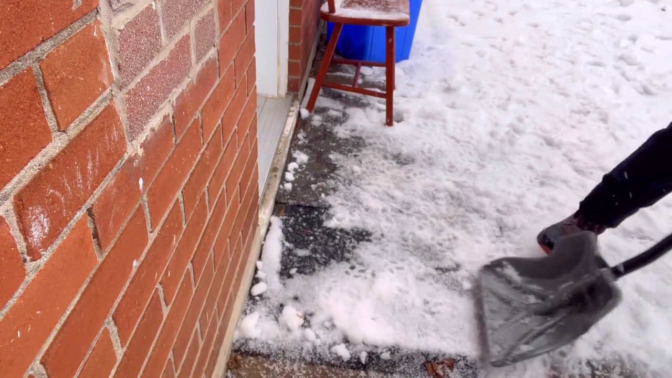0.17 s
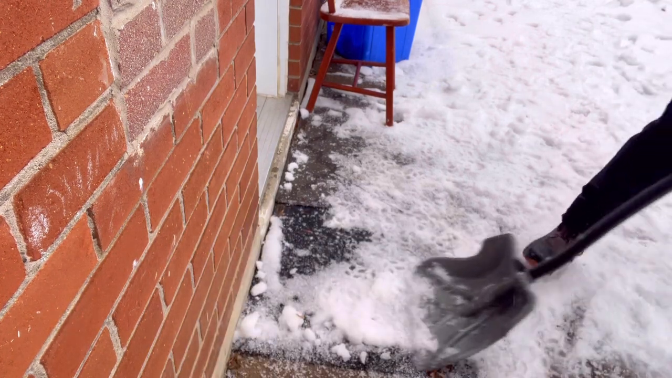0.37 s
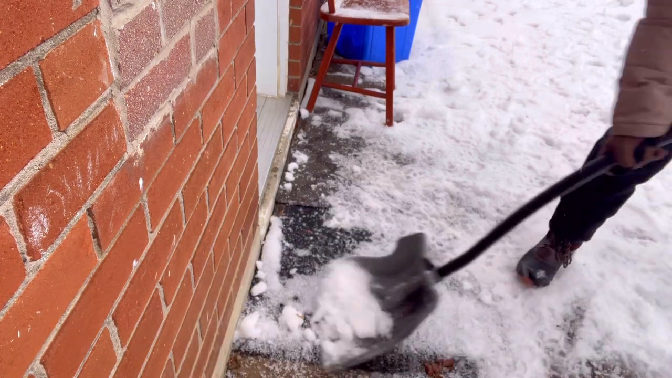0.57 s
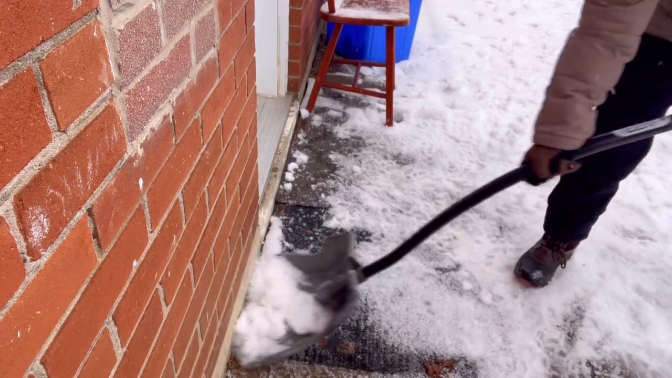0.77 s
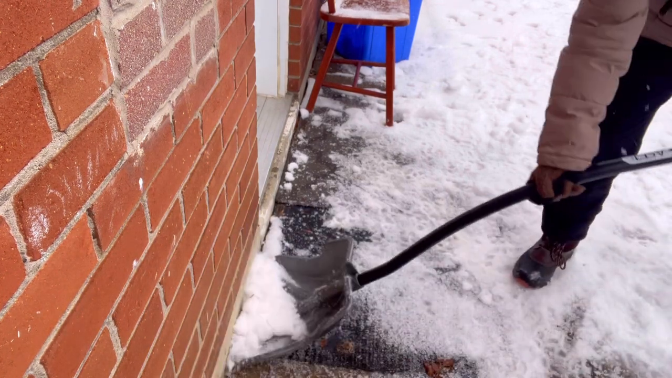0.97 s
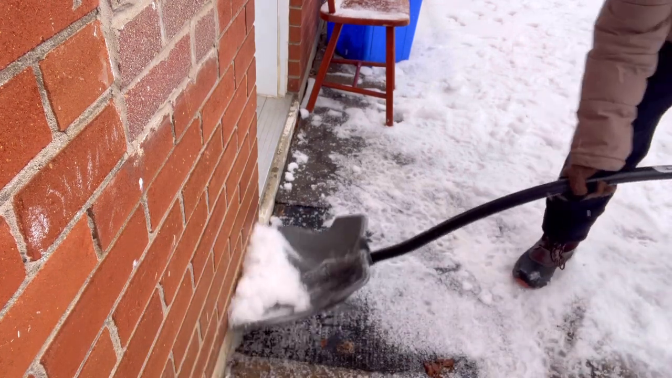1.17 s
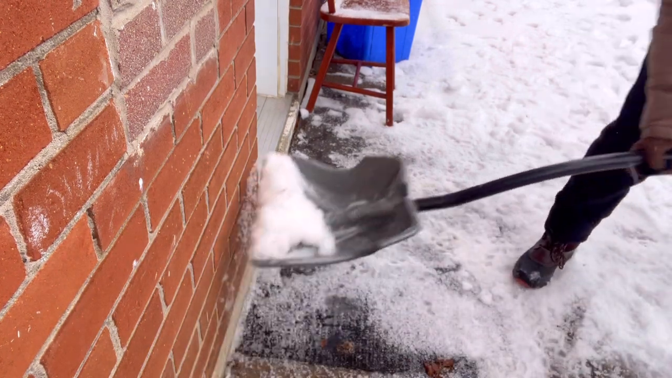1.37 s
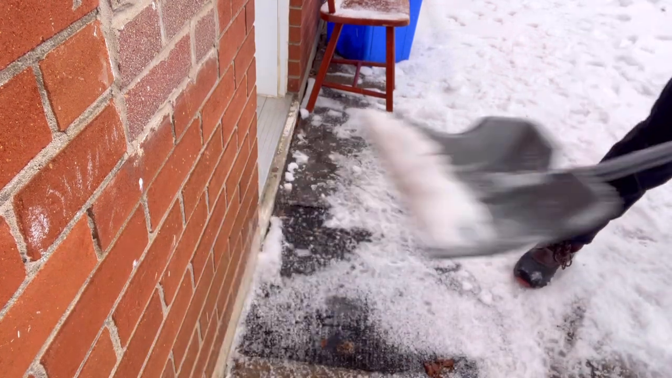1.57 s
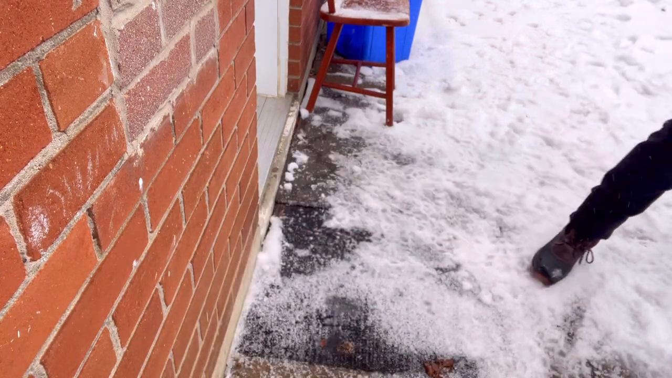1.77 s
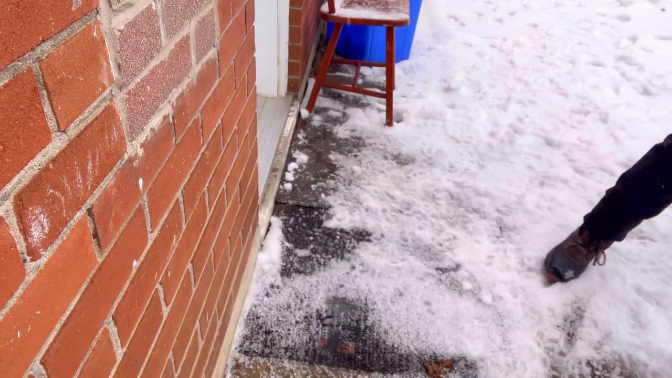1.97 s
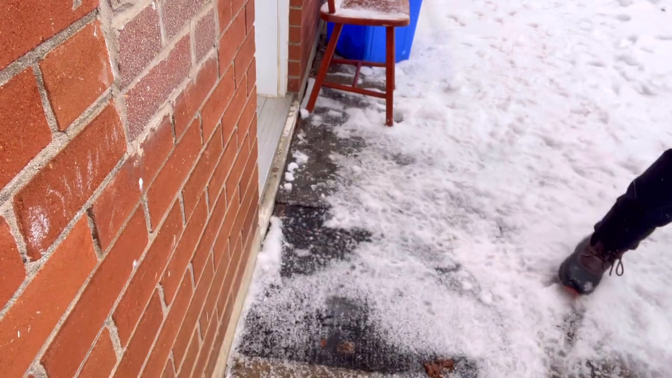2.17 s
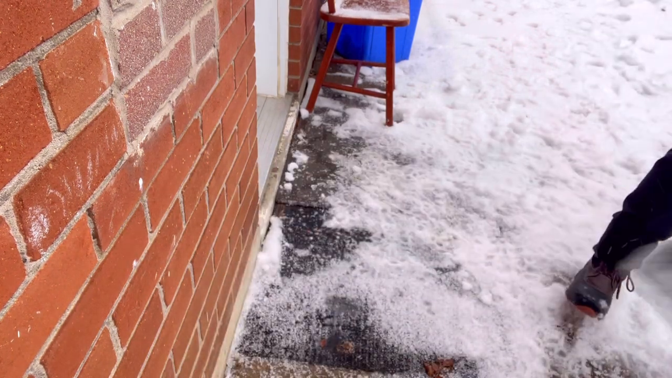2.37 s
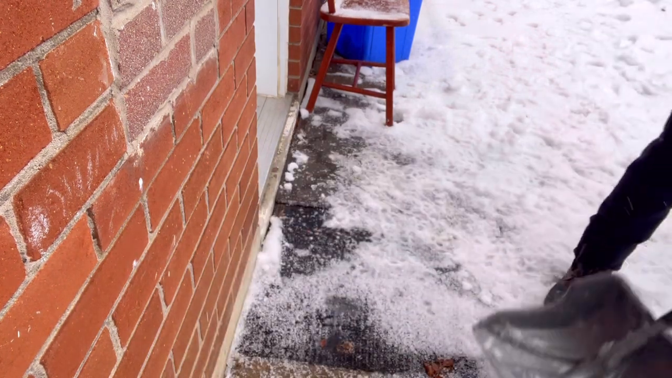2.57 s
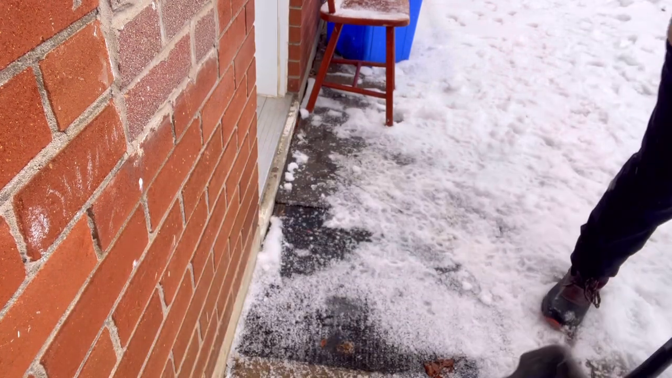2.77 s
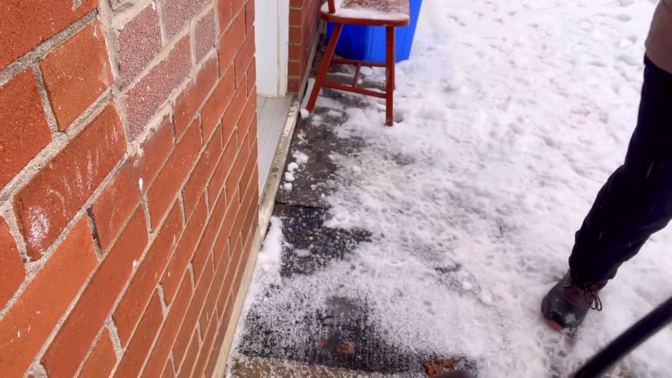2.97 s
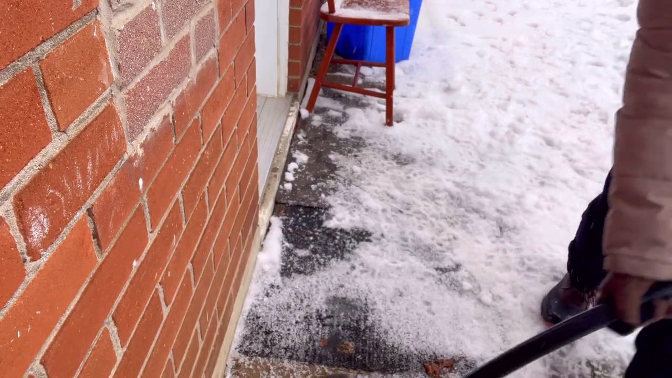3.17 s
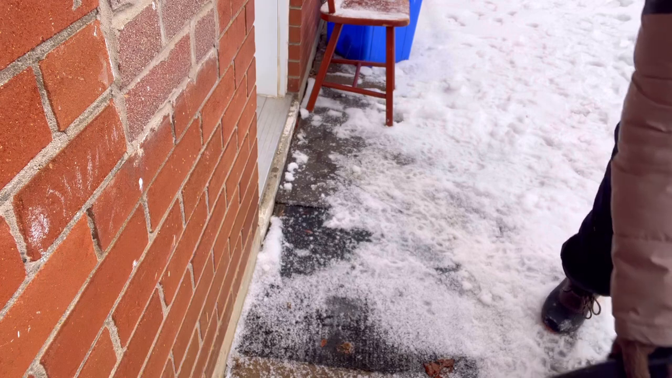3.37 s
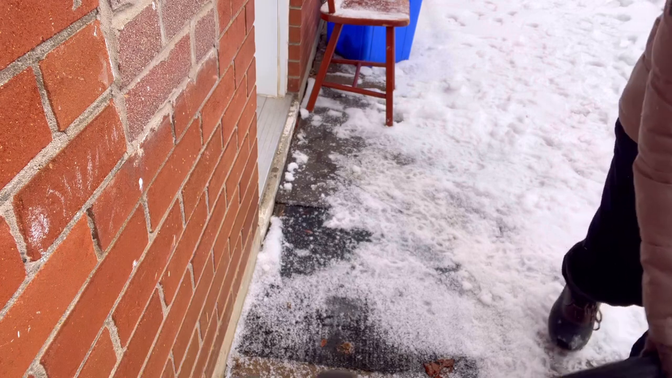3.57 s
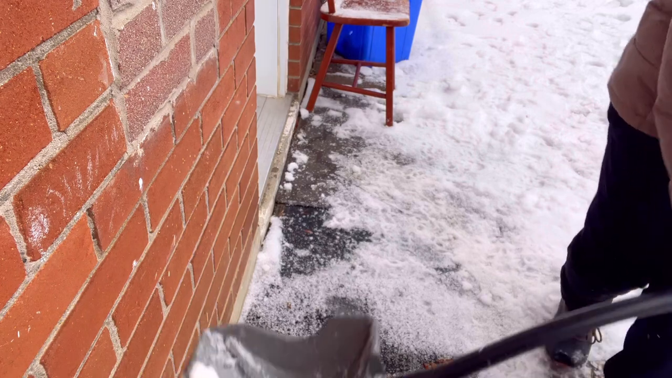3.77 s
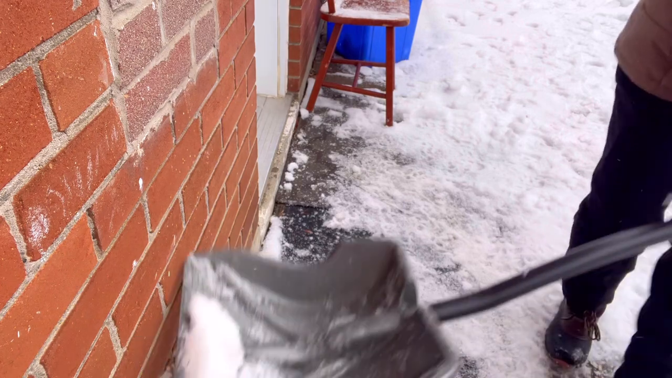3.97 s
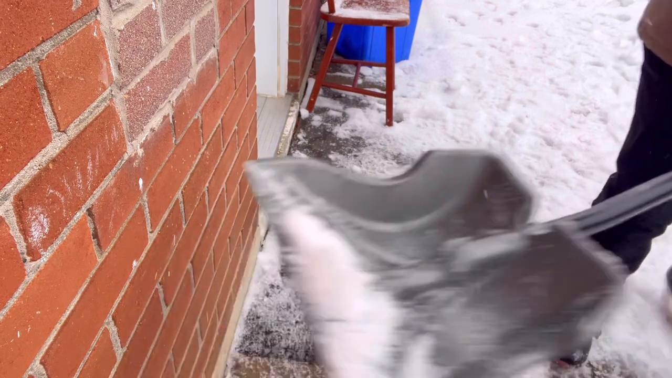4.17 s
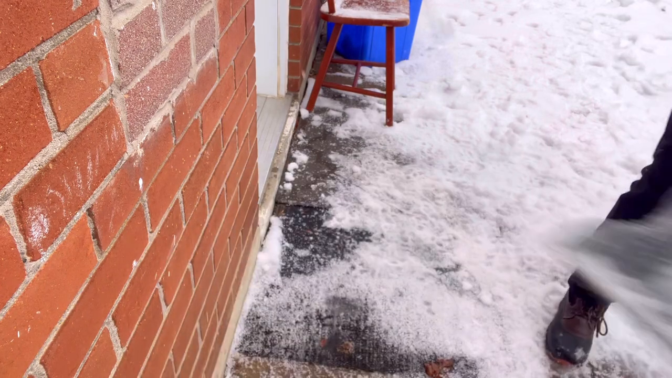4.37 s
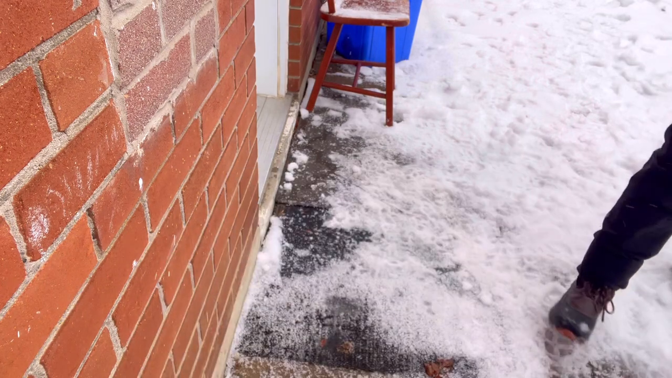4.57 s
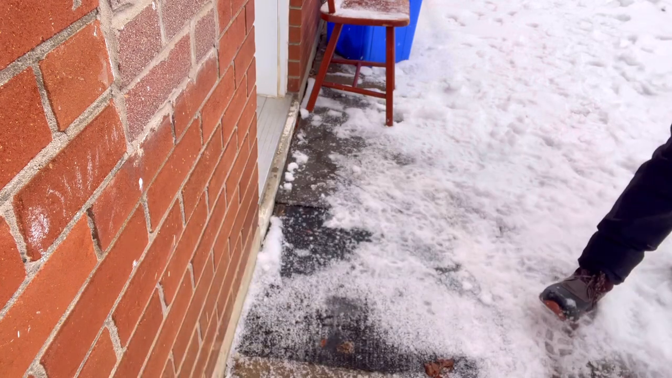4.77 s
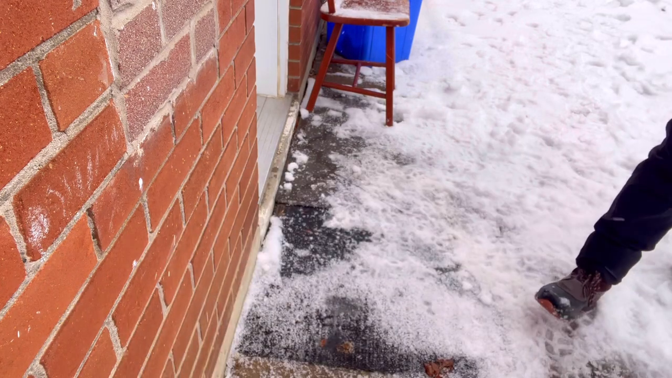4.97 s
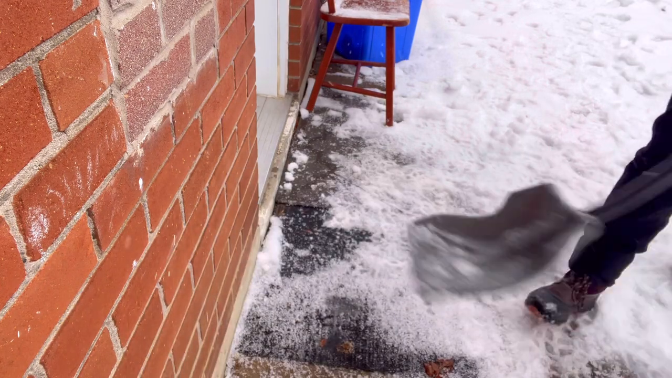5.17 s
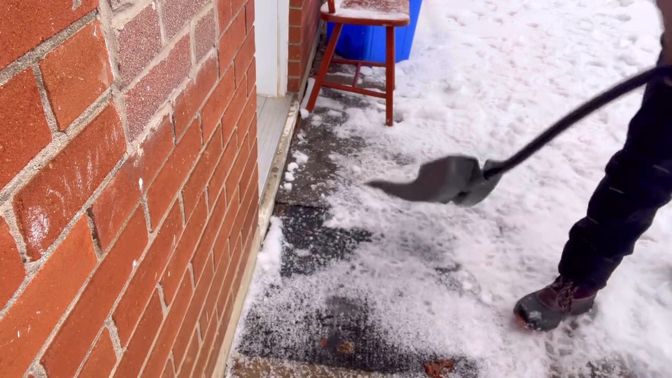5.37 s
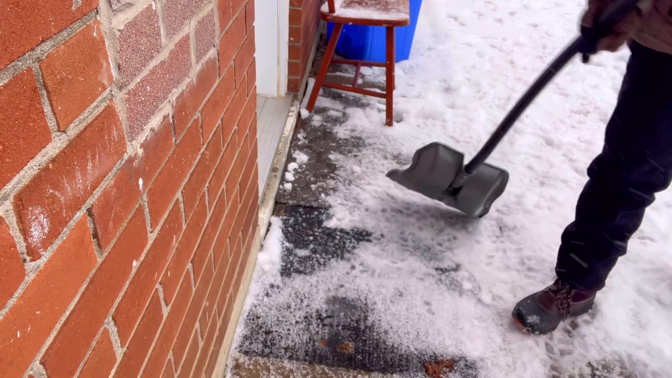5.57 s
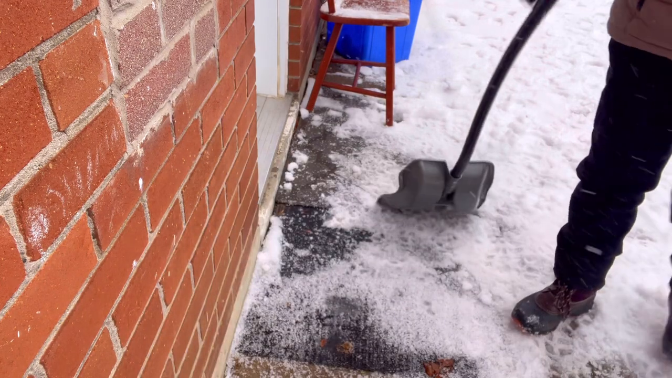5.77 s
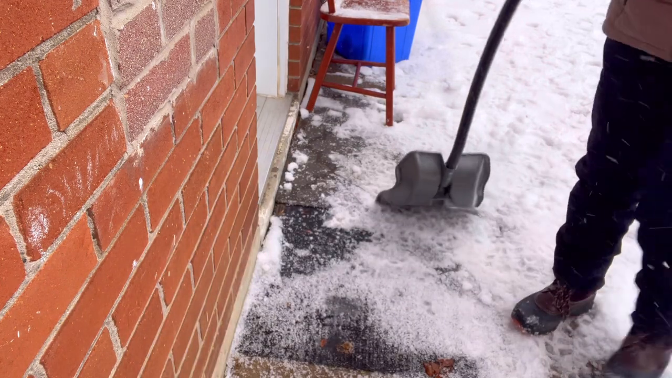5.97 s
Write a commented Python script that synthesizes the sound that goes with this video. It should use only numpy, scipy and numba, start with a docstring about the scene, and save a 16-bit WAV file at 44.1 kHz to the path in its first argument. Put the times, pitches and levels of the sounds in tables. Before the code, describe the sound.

Two rasping shovel pushes across slushy paving end in hollow plastic knocks and stuttering groans, with coat swishes and soft snow crunches between.

```python
"""Shovelling slush towards a wall

A plastic snow shovel is pushed twice over slushy paving to a brick wall, then set down and dragged briefly.
Showers of tiny impacts make the edge rasp and hiss; stick and slip makes the scoop boom and the edge groan.
Damped swings make the knocks at the wall, dull thuds, and small clicks of ice, stone and the scoop.
Shaped noise makes the coat rustle, the snow crunch and the low outdoor rumble; two small ports hear it all.
"""
import sys
import numpy as np
from scipy import signal
from scipy.fft import rfft, irfft, next_fast_len
from scipy.io import wavfile
from scipy.ndimage import uniform_filter1d, map_coordinates
from numba import njit

SR = 44100
rng = np.random.default_rng(int(sys.argv[2]) if len(sys.argv) > 2 else 0)


def put_to_file(sound):
    """Save the sound as 16-bit audio at rate SR, in the file named by the first command-line argument."""
    columns = np.atleast_2d(sound).T  # one column per channel
    safe = np.clip(columns, -1, 1)
    whole_steps = np.round(safe * 32767)
    wavfile.write(sys.argv[1], SR, whole_steps.astype(np.int16))


N = 265217

# The edge slides over the paving; levels are those at the start, before the ground changes them:
# start t/s, stop t/s, rasp level/dB, grit hiss level/dB, boom level/dB, flexing edge f/Hz
PUSHES = [(0.264, 0.806, -25.5, -25, -35.5, 1280), (2.703, 3.189, -21.5, -25.5, -34, 1034),
          (5.542, 5.555, -29, -27, -29, 1400), (5.663, 5.746, -37, -42, -33, 1350),
          (5.795, 5.86, -39, -43, -37, 1490)]
# The loaded scoop is prised up along the wall; levels before fades and ground: grip t/s, hardest t/s,
# free t/s, rasp level/dB, grit hiss level/dB, boom level/dB, rise of force/dB, fall of force/dB
LIFTS = [(0.994, 1.113, 1.201, -28.5, -31, -7, 26, 36), (3.327, 3.512, 3.768, -25.5, -30, -9, 26, 20.5)]
# The edge catches on stones: t/s, rasp level/dB, grit hiss level/dB, boom level/dB, time to fall 60 dB/s
CATCHES = [(0.274, -22.5, -34, -42, 0.19), (0.971, -36, -40, -53, 0.13), (1.049, -23, -40, -15, .035),
           (1.106, -27, -32, -36, 0.031), (1.209, -45, -39, -33, 0.056), (2.695, -15.5, -21, -40, 0.13),
           (2.715, -16.5, -22, -46, 0.07), (2.775, -14, -20, -32, 0.027), (2.819, -16, -30, -38, 0.095),
           (2.854, -32, -33, -47, 0.074), (2.883, -20.5, -32, -41, 0.066), (2.902, -30, -22, -21, 0.077),
           (3.01, -22.5, -34, -26, 0.044), (3.046, -8, -34, -37, 0.015), (3.068, -39, -35, -36, 0.022),
           (3.126, -20, -35, -57, 0.037), (3.324, -26, -37.5, -43, 0.055), (3.351, -31.5, -36, -26, 0.4),
           (3.628, -28.5, -36, -25, 0.019), (3.688, -24.5, -47, -15, 0.053), (3.748, -36, -59, -3, 0.034),
           (3.785, -24.5, -40.5, -25.5, 0.21), (3.854, -28.5, -39, -54, 0.11), (5.557, -45, -64, -27, 0.32),
           (5.673, -30.5, -33.5, -38, 0.13), (5.719, -22, -27.5, -46, 0.043)]
# Uneven ground (bare stone and packed snow swell a stroke, slush muffles it, a stuck edge falls quiet):
# middle t/s, half width/s, change of rasp/dB, change of hiss/dB, change of boom/dB
PATCHES = [(0.334, 0.022, -6, -2, 0.5), (0.43, 0.1, 1, 1.5, 2.5), (0.61, 0.13, -2.5, -1.5, 0.5),
           (0.816, 0.0099, -9, -9.5, 22), (1.02, 0.019, -2, -9.5, 2.5), (1.084, .018, -4, -1.5, -2),
           (1.161, 0.0089, 2, 3.5, -20), (2.756, 0.057, -2.5, -6.5, 7), (2.836, 0.066, 1, 6.5, -3),
           (2.875, 0.019, -1.5, -1.5, -2), (2.957, 0.035, -3.5, 2.5, 2), (3.029, 0.058, 2, 6.5, 3.5),
           (3.11, 0.026, 0, 0.5, -2), (3.17, .02, -0.5, -0.5, 1.5), (3.466, .008, 4, -8, -2.5),
           (3.541, .008, 4, 2, -4.5), (3.578, 0.0053, 3, 5.5, -7.5), (3.676, 0.026, -2.5, 2, -6.5),
           (3.714, .008, -0.5, -5, -8.5), (3.777, 0.011, -3, 4, 0.5), (5.637, 0.01, 12.5, 7, -3),
           (5.773, 0.014, 7, 5.5, 4)]
# The scoop runs into the wall and shudders: t/s, knock level/dB, first f/Hz, swell/s, shudder level/dB
BUMPS = [(0.8059, -1.5, 874, 0.0013, -19), (1.1715, -9, 1090, 0.005, -18.5),
         (1.1844, -2.5, 810, 0.0035, -40.5), (3.192, -2.5, 882, 0.003, -12.5)]
# The stuck edge jerks free during a lift: t/s, knock level/dB, first f/Hz, swell/s
JOLTS = [(1.0698, -7.5, 885, 0.00097), (1.0944, -9, 1130, 0.0015), (1.108, -4.5, 594, 0.0023),
         (1.113, -4.5, 585, 0.0022), (1.1202, -5, 628, 0.0027), (1.1777, -26, 1070, 0.0035),
         (3.4315, -9, 790, 0.0022), (3.4799, -1.5, 740, 0.0021), (3.4894, -5, 642, 0.0036),
         (3.4953, -6, 800, .0015), (3.504, -3.5, 774, 0.0014), (3.518, -6.5, 655, 0.0025),
         (3.5218, 0, 682, 0.0023), (3.5516, -10.5, 770, 0.0019), (3.563, -9, 680, 0.0007),
         (3.5848, -1.5, 642, 0.0028), (3.607, -3.5, 716, 0.0026), (3.626, -3, 665, 0.0028),
         (3.6324, -3.5, 730, 0.0029), (3.647, -8, 570, 0.005), (3.6566, -20.5, 593, 0.0048),
         (3.69, -2, 652, 0.0027), (3.724, -9, 545, 0.0018), (3.749, -15, 1045, 0.0017)]
# The blade binds on brick, ice or stone and groans: start t/s, stop t/s, level/dB, first f/Hz, last f/Hz
GROANS = [(0.774, 0.807, -28.5, 1400, 1490), (0.833, 0.888, -41, 650, 570),
          (0.995, 1.05, -34.5, 1290, 1380), (1.049, 1.086, -27, 1330, 1220), (1.056, 1.076, -24, 650, 880),
          (1.105, 1.124, -26.5, 1180, 1190), (1.131, 1.131, -20, 507, 445), (1.17, 1.18, -20, 1050, 917),
          (1.19, 1.204, -29, 624, 447), (2.702, 2.694, -27, 1040, 960), (2.784, 2.81, -22, 1120, 890),
          (2.82, 2.865, -30, 1130, 1260), (2.888, 2.923, -24.5, 1340, 1154), (3.008, 3.015, -28, 1190, 965),
          (3.01, 3.075, -26, 500, 560), (3.344, 3.423, -37.5, 690, 710), (3.419, 3.443, -16, 734, 688),
          (3.469, 3.528, -22.5, 820, 695), (3.555, 3.673, -30.5, 547, 520),
          (3.491, 3.56, -38.5, 1440, 1400), (3.753, 3.766, -31.5, 1030, 970), (3.791, 3.818, -36, 944, 930),
          (3.856, 3.86, -29, 730, 675), (5.593, 5.64, -41, 540, 490), (5.668, 5.738, -37, 1310, 1360),
          (5.723, 5.732, -28, 1450, 1340), (5.84, 5.855, -37, 1600, 1450), (5.79, 5.849, -38, 440, 407)]
# The coat swishes as the arms swing and snow slides about; rise and fall each span 20 dB:
# loudest t/s, rise/s, fall/s, swish level/dB, crunch level/dB, f/Hz
SWINGS = [(1.301, 0.37, 0.28, -49.5, -55.5, 900), (1.753, 0.15, 0.26, -43, -46, 1070),
          (2.61, 0.28, 0.13, -45.5, -72, 1085), (4.0, 0.15, 0.13, -48.5, -92, 990),
          (4.29, 0.15, 0.09, -45, -64, 860), (4.375, 0.06, 0.072, -49, -75, 940),
          (4.42, 0.045, 0.064, -51.5, -63, 1090), (4.7, 0.71, 0.42, -47, -57, 945),
          (5.21, 0.19, 0.45, -50, -67, 1020), (5.42, 0.49, 0.7, -51.5, -53.5, 1200)]
# Boots press into the snow and thrown snow showers down:
# t/s, hold/s, soft rush level/dB, crunch level/dB, time to fall 60 dB/s
CRUNCHES = [(1.511, 0.0048, -42, -51, 0.19), (1.897, 0.058, -41.5, -44.5, 0.37),
            (2.24, 0.04, -49.5, -41.5, 1.1), (3.24, 0.023, -33.5, -42.5, 0.54),
            (3.914, 0.0068, -40.5, -44.5, 0.24), (4.134, 0.0069, -46, -44, 0.16),
            (4.209, 0.042, -39.5, -48, 0.15), (4.568, 0.013, -39.5, -50.5, 0.44),
            (4.841, 0.11, -48.5, -46.5, 0.29)]
# Small clicks and cracks: icy crumbs land, the edge strikes stone, the scoop clacks or is tapped:
# t/s, click level/dB, click f/Hz, crack level/dB
CLICKS = [(1.326, -43, 980, -56), (1.622, -40, 1470, -51), (1.677, -45, 1500, -57), (1.885, -32, 2250, -47),
          (1.899, -48, 1390, -35), (1.964, -33, 3240, -31), (1.972, -38, 1800, -44), (2.22, -43, 6660, -41),
          (2.675, -30, 1130, -33), (2.7, -13, 1100, -27), (2.777, -18, 1120, -14), (2.887, -9, 1310, -8),
          (2.9, -14.5, 1290, -18), (3.625, -19, 2120, -36), (3.688, -21, 2020, -43), (3.746, -20, 990, -49),
          (3.787, -26.5, 1030, -48), (3.857, -28, 730, -41), (3.92, -33, 2100, -45),
          (4.129, -43, 1250, -42), (4.205, -41, 690, -52), (4.143, -40, 1110, -58), (4.228, -33, 4350, -41),
          (4.248, -41, 880, -45), (4.516, -44, 2600, -42), (4.572, -30.5, 780, -44),
          (4.574, -30.5, 990, -50), (4.596, -41, 950, -51), (4.667, -36, 2600, -32),
          (4.795, -45, 1640, -65), (4.818, -45, 3700, -47), (4.857, -36, 1700, -35.5),
          (4.882, -44, 2700, -51), (4.929, -35, 4070, -30), (5.541, -37, 1510, -39), (5.56, -28, 1220, -42),
          (5.676, -24, 1410, -45), (5.719, -20, 1380, -45), (5.74, -38, 1290, -42), (5.816, -28, 1170, -49),
          (5.852, -42, 1590, -37)]
# Dull thuds of boots, clumps of snow and the scoop being set down: t/s, level/dB, f/Hz
THUDS = [(0.815, -38, 69), (0.927, -41.5, 60), (1.383, -37, 66), (1.501, -34, 80), (2.562, -35.5, 71),
         (3.325, -20, 236), (4.22, -32.5, 169), (4.244, -31.5, 197), (4.577, -40, 64), (4.587, -47, 252),
         (4.878, -35.5, 198), (5.508, -31.5, 66), (5.56, -28, 102), (5.564, -28.5, 250),
         (5.585, -29.5, 216), (5.63, -28.5, 302), (5.715, -25.5, 92.6), (5.735, -31.5, 194),
         (5.836, -20, 59.5)]
# Slow drift of the rumble: t/s, change of level/dB
RUMBLE_SWELL = [(0, -2), (1.3, -1.5), (1.701, 1.5), (2.6, 3), (3.898, -5.5), (4.3, -2.5), (5.2, 5.5),
                (6.0, 8.5)]
# Resonances of the scoop: f/Hz, width/Hz, level/dB
SCOOP = [(274, 16, 3), (391, 20, 9), (461, 12, 5), (509, 22, 3), (547, 25, 4), (643, 20, 0), (687, 20, 3),
         (770, 25, 0), (930, 35, 1), (1038, 35, 3), (1247, 28, 3), (1410, 35, -1), (1671, 28, -3),
         (2020, 18, -3), (2655, 16, -1), (3633, 18, 0)]
# Relative spectra of edge, grit, scoop, cloth and background: f/Hz, level/dB
RASP = [(40, -21), (110, -4), (220, -1.5), (380, -24.5), (700, -6), (1150, -4.5), (1650, -2.5),
        (2300, -2.5), (3100, -13.5), (5000, -25), (16000, -44.5)]
GRIT = [(800, -32.5), (2200, 4), (3700, 0), (5000, -0.5), (6500, 1.5), (8300, 0), (10000, -9.5),
        (12500, -13), (14500, -11), (16000, -4)]
BOOM = [(30, -53), (100, -10), (220, 5.5), (400, 3), (600, 1.5), (950, -8.5), (1300, -24.5), (3000, -13),
        (8000, -62)]
SWISH = [(60, 2.5), (200, 1), (420, -3.5), (950, -12.5), (1500, -9), (3000, -15), (9000, -37)]
RUMBLE = [(20, -47), (33, -29), (48, 0.5), (63, 1), (95, 0.5), (130, -9.5), (200, -16), (310, -21.5),
          (500, -19), (950, -24), (2000, -30.5), (4000, -44), (8000, -37.5), (16000, -63)]
# Echo of the wall: f/Hz, time to fall 60 dB/s
WALL = [(150, 0.12), (1000, 0.15), (10000, 0.012)]
# Left port against the right: f/Hz, phase lead/radians
PORT_PHASE = [(20, 0), (120, -.3), (290, -1.25), (390, -2.8), (490, -3.8), (620, -4.3), (800, -4.55),
              (1050, -5.3), (1600, -7.5), (2200, -8.7), (3000, -8.8), (3700, -7.4), (8000, -8.6),
              (10000, -9.4)]
# Left port against the right: f/Hz, level/dB
PORT_BALANCE = [(50, 0), (130, 3.5), (230, 3.5), (305, 1), (390, -7.5), (480, -8.5), (680, -3.5),
                (930, -2.5), (1450, -5.5), (2150, -7.5), (2600, -5), (3350, -12), (4300, 1.5), (5900, -12),
                (7000, -7.5), (9500, -1)]
# How alike left and right are before the port difference: f/Hz, likeness from 0 to 1
ALIKE = [(50, 0.95), (200, 0.77), (400, 1), (900, 0.69), (1250, 0.24), (1600, 0.32), (2300, 0.39),
         (3500, 0.073), (6000, 0.076), (10000, 1), (13000, 1), (15500, 0.28)]

BITE_S, RELEASE_DB_PER_S = 0.023, 506.5  # the edge takes hold; the scraping dies away once it stops
SETTLE_DB, SETTLE_DB_PER_S = -19.5, 70.5  # loose snow keeps sliding after the edge stops
RASP_FADE_DB_PER_S, HISS_FADE_DB_PER_S, BOOM_GROWTH_DB_PER_S = 9, 6, 13  # as snow loads the scoop
EDGE_RISE_HZ_PER_S, STALL_S, STALLED_HZ = 1370, 0.2, 965  # the edge sings higher with speed, then stalls
EMPTY_SCOOP_HZ, LOAD_OCTAVES_PER_S = 875, 0.21  # the boom sinks under the load
RASP_FOLLOWS_FORCE, HISS_FOLLOWS_FORCE = 0.18, 0.35  # dB per dB of force in a lift
LIFT_RASP_FADE_DB_PER_S, LIFT_HISS_FADE_DB_PER_S = 17, 37.5  # the edge leaves the grit
LIFT_HZ, LOADED_HZ, LIFT_EDGE_HZ = 580, 360, 770  # boom at first and at last; the bent edge stays low
REBOUND_S = 0.01  # the scoop bounces off the wall and shudders when it touches again
SHUDDER_T60_S, SHUDDER_HZ = 0.17, 440  # T60: time to fall 60 dB
SHUDDER_RASP_DB, SHUDDER_HISS_DB = -11, -20  # the shudder also rubs the edge on the wall
GROAN_RISE_S, GROAN_T60_S, GROAN_DAMPING = 0.004, 0.05, 0.32
DISPERSION_S = 0.006  # bending waves bring the treble first: a knock's pitch halves in this time
SWISH_BEND_OCTAVES, SWISH_BROAD_DB = 0.24, -2  # pitch rises with the swing; broad noise under the resonance
CRUNCH_ATTACK_S, RUSH_HZ = 0.043, 850  # pitch of the soft rush of snow
CRACK_T60_S, SCATTER_DB, SCATTER_T60_S = 0.015, -15, 0.07  # a crack and its fainter, longer scatter
RUMBLE_DB = -46.5  # before the drift and wavering
RUMBLE_WANDER_DB, RUMBLE_WANDER_PER_S = 1.2, 6.5  # light air stirs the bass on each side separately
TOP_HZ = 16000


def shovelling():
    """Gains of rasp, hiss and boom, and pitches of edge and scoop, from the sliding, catches and bumps."""
    rasps, hisses, booms, edge_hz, scoop_hz = np.swapaxes([*pushes(), *lifts()], 0, 1)
    gains = paving() * np.array([rasps.sum(0), hisses.sum(0), booms.sum(0)])
    for s, *levels_db, t60 in CATCHES:
        add(gains, s, np.array([dying(db, t60) for db in levels_db]))
    shudder = np.zeros(N)
    for s, *_, db in BUMPS:
        add(shudder, s + REBOUND_S, dying(db, SHUDDER_T60_S))
    rasp, hiss, boom = gains
    rasp = rasp + amp(SHUDDER_RASP_DB) * shudder
    hiss = hiss + amp(SHUDDER_HISS_DB) * shudder
    # Overlapping contacts share one pitch, weighted by how loud each is.
    edge_pitch = np.average(edge_hz, axis=0, weights=rasps)
    scoop_pitch = ((booms * scoop_hz).sum(0) + shudder * SHUDDER_HZ) / (booms.sum(0) + shudder)
    return rasp, hiss, boom + shudder, edge_pitch, scoop_pitch


def pushes():
    """For each push, gains of rasp, hiss and boom and two pitches: the growing load dulls the sound."""
    for start, stop, rasp_db, hiss_db, boom_db, hz in PUSHES:
        length = stop - start
        age = since(start, length)
        stall = np.clip((age - max(length - STALL_S, STALL_S)) / STALL_S, 0, 1)
        levels = amp([rasp_db - RASP_FADE_DB_PER_S * age,
                      hiss_db - HISS_FADE_DB_PER_S * age,
                      boom_db + BOOM_GROWTH_DB_PER_S * age])
        rasp, hiss, boom = levels * sliding(start, stop, BITE_S)
        edge_hz = (hz + EDGE_RISE_HZ_PER_S * age) * (1 - stall) + STALLED_HZ * stall
        scoop_hz = EMPTY_SCOOP_HZ / 2 ** (LOAD_OCTAVES_PER_S * age)
        yield rasp, hiss, boom, edge_hz, scoop_hz


def lifts():
    """The same for each lift: the force builds until the load gives, and the boom sinks."""
    for grip, hardest, free, rasp_db, hiss_db, boom_db, rise_db, fall_db in LIFTS:
        age = since(grip, free - grip)
        force_db = np.interp(grip + age, [grip, hardest, free], [-rise_db, 0, -fall_db])
        levels = amp([rasp_db + RASP_FOLLOWS_FORCE * force_db - LIFT_RASP_FADE_DB_PER_S * age,
                      hiss_db + HISS_FOLLOWS_FORCE * force_db - LIFT_HISS_FADE_DB_PER_S * age,
                      boom_db + force_db])
        rasp, hiss, boom = levels * sliding(grip, free, attack_s=0.067)
        scoop_hz = np.interp(age, [0, free - grip], [LIFT_HZ, LOADED_HZ])
        yield rasp, hiss, boom, np.full(N, LIFT_EDGE_HZ), scoop_hz


def sliding(start, stop, attack_s):
    """Gain of one contact of the edge: it ends quickly, and loose snow settles after it."""
    contact = held(start, stop, attack_s, RELEASE_DB_PER_S)
    return contact + amp(SETTLE_DB) * held(start, stop, attack_s, SETTLE_DB_PER_S)


def paving():
    """Gains of rasp, hiss and boom from the ground under the edge, one smooth hump or dip per patch."""
    t = np.arange(N) / SR
    change_db = sum(np.outer(db, np.exp(-((t - s) / width) ** 2)) for s, width, *db in PATCHES)
    return amp(change_db)


def scrape(rasp, hiss, edge_hz):
    """The edge chatters over grit: coarse grains ring the edge and scoop, fine ones hiss."""
    bite = chatter(rate=130, scatter_db=2.5, hold_s=0.004, sliding=1.5)
    coarse = patchy(grains(rate=9000, scatter_db=1.0) * bite, depth_db=2.1)
    coarse = coarse + amp(8) * flex(coarse, edge_hz, damping=0.33)
    sand = 3.5 * rng.standard_normal((2, N))
    fine = grains(rate=4300, scatter_db=-18.0) * bite + sand * np.sqrt(np.abs(bite))
    fine = patchy(fine, depth_db=3.5)
    rasping = unit(spread(coarse, lambda hz: colour(RASP, hz) * scoop(hz, ring_db=-2)))
    hissing = unit(spread(fine, lambda hz: colour(GRIT, hz) * scoop(hz, ring_db=7.5)))
    return rasp * rasping + hiss * hissing


def judder(boom, scoop_hz):
    """Under load the edge sticks and slips and the scoop booms; it sticks fast just before each knock."""
    t = np.arange(N) / SR
    knock_s = np.sort([row[0] for row in JOLTS + BUMPS])
    following = np.minimum(np.searchsorted(knock_s + 0.005, t), len(knock_s) - 1)
    wait = knock_s[following] - t
    stuck = np.exp(-(wait / 0.007) ** 2)
    slips = grains(rate=2200, scatter_db=2.0) * amp(-12 * stuck)
    slips = slips + amp(5.5) * flex(slips, scoop_hz, damping=0.33)
    return boom * unit(spread(slips, lambda hz: colour(BOOM, hz) * scoop(hz, ring_db=1.5)))


def groans():
    """Where the blade binds, fast slips drive a bending resonance whose pitch slides with the strain."""
    track, t = np.zeros((2, N)), np.arange(SR // 5) / SR
    all_slips = rng.standard_normal((len(GROANS), 2, len(t)))
    for (start, stop, db, first_hz, last_hz), slips in zip(GROANS, all_slips):
        hz = np.interp(t, [0, stop - start], [first_hz, last_hz])
        fall_db = -60 * np.maximum(t - (stop - start), 0) / GROAN_T60_S
        grip = np.minimum(t / GROAN_RISE_S, 1) * amp(fall_db)
        bent = flex(slips, hz, GROAN_DAMPING)
        groan = grip * flex(bent, hz, GROAN_DAMPING)  # the second pass narrows the tone
        add(track, start, amp(db) * unit(groan) * np.sqrt(np.mean(grip ** 2)))
    return spread(track, lambda hz: scoop(hz, ring_db=-3.0))


def knocks():
    """A jolt or bump is a few swings of the scoop, falling in pitch, with a faint ring and little bass."""
    track, t = np.zeros(N), np.arange(SR // 20) / SR
    cycles = DISPERSION_S * np.log1p(t / DISPERSION_S)
    for s, db, hz, swell_s, *_ in JOLTS + BUMPS:
        swell = (t / swell_s * np.exp(1 - t / swell_s)) ** 2
        blow = swell * np.sin(2 * np.pi * hz * cycles)
        add(track, s, amp(db) * (blow + amp(-19) * push(t, hz=164.0, cycles=0.88)))
    thin_bass = lambda hz: (1j * hz / (50 + 1j * hz)) ** 2
    return filtered(track, lambda hz: scoop(hz, ring_db=-10.5) * thin_bass(hz))


def rustle():
    """Coat cloth swishes, higher on a quicker swing; snow rushes and crunches; cracks go with the clicks."""
    t = np.arange(N) / SR
    swish, rush, crunch, cracks, pitch = np.zeros((5, N))
    for s, rise_s, fall_s, swish_db, crunch_db, hz in SWINGS:
        swell = amp(-20 * np.maximum((s - t) / rise_s, (t - s) / fall_s))
        swish = swish + amp(swish_db) * swell
        crunch = crunch + amp(crunch_db) * swell
        pitch = pitch + hz * 2 ** (SWISH_BEND_OCTAVES * (swell - 1)) * amp(swish_db) * swell
    for s, hold_s, rush_db, crunch_db, t60 in CRUNCHES:
        press = held(s, s + hold_s, CRUNCH_ATTACK_S, 60 / t60)
        rush = rush + amp(rush_db) * press
        crunch = crunch + amp(crunch_db) * press
    for s, _, _, db in CLICKS:
        add(cracks, s, dying(db, CRACK_T60_S) + dying(db + SCATTER_DB, SCATTER_T60_S))
    fibres = patchy(rng.standard_normal((2, N)), depth_db=2.5)
    fibres = amp(SWISH_BROAD_DB) * fibres + amp(10) * flex(fibres, pitch / swish, damping=0.26)
    packing = chatter(rate=90, scatter_db=3, hold_s=0.006, sliding=0.9)
    crystals = patchy(grains(rate=4000, scatter_db=2) * packing, depth_db=3.2)
    lumps = grains(rate=3000, scatter_db=1) * packing
    lumps = lumps + amp(5) * flex(lumps, np.full(N, RUSH_HZ), damping=0.36)
    crackle = patchy(rng.standard_normal((2, N)), depth_db=2.5)
    soft = lambda x: unit(spread(x, lambda hz: colour(SWISH, hz)))
    gritty = lambda x: unit(spread(x, lambda hz: colour(GRIT, hz)))
    return swish * soft(fibres) + rush * soft(lumps) + crunch * gritty(crystals) + cracks * gritty(crackle)


def small_hits():
    """Small clicks and dull thuds, each a short damped swing."""
    track, t = np.zeros(N), np.arange(SR // 6) / SR
    for s, db, hz, _ in CLICKS:
        add(track, s, amp(db) * push(t, hz, cycles=2.8))
    for s, db, hz in THUDS:
        add(track, s, amp(db) * push(t, hz, cycles=1.21))
    return track


def wall(x):
    """Brickwork answers briefly with fading noise; the snow swallows the treble first."""
    hz, t, z = signal.stft(rng.standard_normal((2, SR // 4)), SR, nperseg=256)
    fade = amp(-60 * t / along(WALL, hz)[:, None])
    tail = signal.istft(z * fade, SR, nperseg=256)[1]
    return signal.fftconvolve(x, tail / np.linalg.norm(tail[0]), axes=1)[:, :N]


def rumble():
    """A low outdoor rumble of shaped noise that drifts and wavers, with a faint steady hiss above it."""
    t = np.arange(N) / SR
    noise = rng.standard_normal((2, N))
    floor = amp(RUMBLE_DB) * unit(spread(noise, lambda hz: amp(along(RUMBLE, hz))))
    bass = filtered(floor, lambda hz: 1 / (1 + (hz / 130) ** 4))
    all_knots = rng.standard_normal(size=(2, 256))
    place = [t * RUMBLE_WANDER_PER_S]
    wander = np.array([map_coordinates(knots, place, mode="wrap") for knots in all_knots])
    drift_db = np.interp(t, *np.transpose(RUMBLE_SWELL))
    return floor - bass + bass * amp(drift_db + RUMBLE_WANDER_DB * wander)


def grains(rate, scatter_db):
    """Tiny impacts at random moments, of uneven size, at a rate per second."""
    struck = rng.random(N) < rate / SR
    size = np.minimum(rng.standard_exponential(N), 3)
    return unit(struck * amp(scatter_db * size) * rng.standard_normal((2, N)))


def chatter(rate, scatter_db, hold_s, sliding):
    """Stick and slip: sudden releases at an uneven rate, each dying away, over some steady sliding."""
    gaps = rng.gamma(shape=3, scale=1 / 3, size=4000)
    starts = (np.cumsum(gaps) * SR / rate).astype(int)
    sizes = amp(scatter_db * np.clip(rng.standard_normal(len(starts)), -2, 2))
    releases = np.bincount(starts, sizes, minlength=N)[:N]
    slipping = signal.lfilter([1], [1, -np.exp(-1 / (hold_s * SR))], releases)
    return unit(sliding + unit(slipping))


def patchy(x, depth_db):
    """The point of contact wanders, so narrow bands swell and fade."""
    z = signal.stft(x, nperseg=512)[2]
    field = rng.standard_normal(z.shape[1:])
    field = uniform_filter1d(field, size=3, axis=0)  # smooth over pitch
    field = uniform_filter1d(field, size=12, axis=1)  # smooth over time
    return signal.istft(z * amp(depth_db * unit(field)), nperseg=512)[1][:, :N]


@njit
def swing(x, step, damping):
    """Velocity of a damped spring whose stiffness changes from sample to sample."""
    out = np.zeros_like(x)
    for c in range(len(x)):
        place = speed = 0.0
        for i in range(x.shape[1]):
            place += step[i] * speed
            speed += step[i] * (damping * (x[c, i] - speed) - place)
            out[c, i] = speed
    return out


def flex(x, hz, damping):
    """One resonance that follows a moving pitch."""
    return swing(x, 2 * np.pi * hz / SR, damping)


def push(t, hz, cycles):
    """A heavily damped swing whose outline peaks at 1 after the given number of cycles."""
    u = t * hz / cycles
    return (u * np.exp(1 - u)) ** 3 * np.sin(2 * np.pi * hz * t)


def scoop(hz, ring_db):
    """The plastic scoop passes a push straight on and rings after it."""
    ring = sum(amp(db) * 1j * hz * w / (c * c - hz * hz + 1j * hz * w) for c, w, db in SCOOP)
    return 1 + amp(ring_db) * ring


def held(start, stop, attack_s, release_db_per_s):
    """Gain per sample: a quick rise of 40 dB up to start, a hold until stop, then a steady fall."""
    t = np.arange(N) / SR
    below_db = 40 * np.maximum(start - t, 0) / attack_s + release_db_per_s * np.maximum(t - stop, 0)
    return amp(-np.minimum(below_db, 200))


def dying(db, t60):
    """Gain of something let go within a millisecond or two, falling 60 dB in t60 seconds."""
    t = np.arange(SR // 3) / SR
    return amp(db - 60 * t / t60) * (1 - np.exp(-t / 0.001))


def since(start, length):
    """Seconds since start, counted no further than length."""
    return np.clip(np.arange(N) / SR - start, 0, length)


def add(track, s, sound):
    """Mix a sound in at time s."""
    part = track[..., round(s * SR):][..., :sound.shape[-1]]
    part += sound[..., :part.shape[-1]]


def amp(db):
    """Decibels to gain."""
    return 10 ** (np.asarray(db) / 20)


def unit(x):
    """Scale to an rms (average strength) of 1."""
    return x / np.sqrt(np.mean(x ** 2) + 1e-20)


def along(points, hz):
    """(Hz, value) points read on a log axis."""
    f, v = np.transpose(points)
    return np.interp(np.log(hz + 1), np.log(f + 1), v)


def filtered(x, response):
    """x shaped by a complex response of frequency."""
    size = 2 * next_fast_len(N // 2 + SR // 4)
    return irfft(rfft(x, size) * response(np.fft.rfftfreq(size, 1 / SR)), size)[..., :N]


def colour(points, hz):
    """A response with the given spectrum that never sounds ahead of its cause (minimum phase)."""
    cepstrum = irfft(np.log(amp(along(points, hz))))
    half = len(cepstrum) // 2
    return np.exp(rfft(np.r_[cepstrum[0], 2 * cepstrum[1:half]], len(cepstrum)))


def spread(pair, response):
    """Two unrelated signals become a coloured, partly alike left and right."""
    turn = lambda hz: np.arccos(np.clip(along(ALIKE, hz), 0, 1)) / 2
    weights = lambda hz: np.array([np.cos(turn(hz)), np.sin(turn(hz))])
    mid, side = filtered(pair, lambda hz: response(hz) * weights(hz))
    return np.array([mid + side, mid - side])


def scene():
    """Shovel and shoveller beside the wall, over the rumble."""
    rasp, hiss, boom, edge_hz, scoop_hz = shovelling()
    shovel = scrape(rasp, hiss, edge_hz) + judder(boom, scoop_hz) + groans() + knocks()
    work = shovel + rustle() + small_hits()
    return work + amp(-23.0) * wall(work) + rumble()


def record(dry):
    """The left port lags and is coloured; the loudest peaks are rounded off; the band is limited."""
    balance = lambda hz: amp(along(PORT_BALANCE, hz))
    left = filtered(dry[0], lambda hz: balance(hz) * np.exp(1j * along(PORT_PHASE, hz)))
    pair = np.array([left, dry[1]])
    rounded = pair / (1 + np.abs(pair / 0.97) ** 6) ** (1 / 6)
    return filtered(rounded, lambda hz: 1 / (1 + (hz / TOP_HZ) ** 200))


dry = scene()
out = record(dry)
put_to_file(out)
```